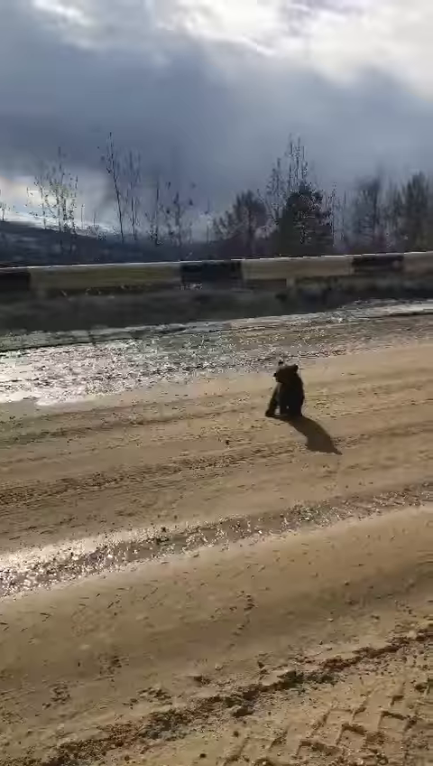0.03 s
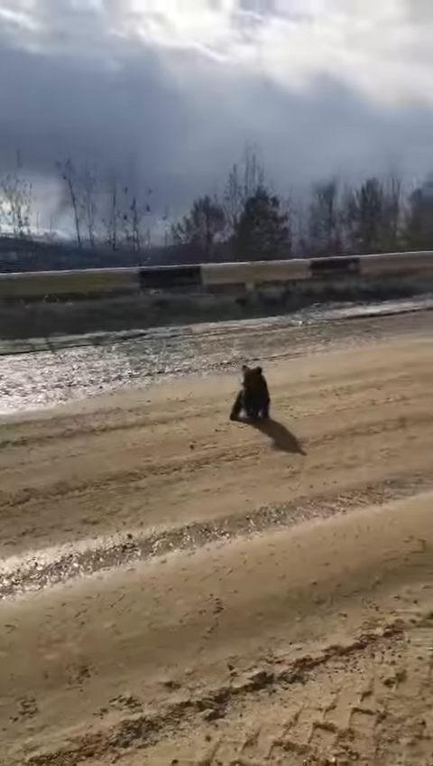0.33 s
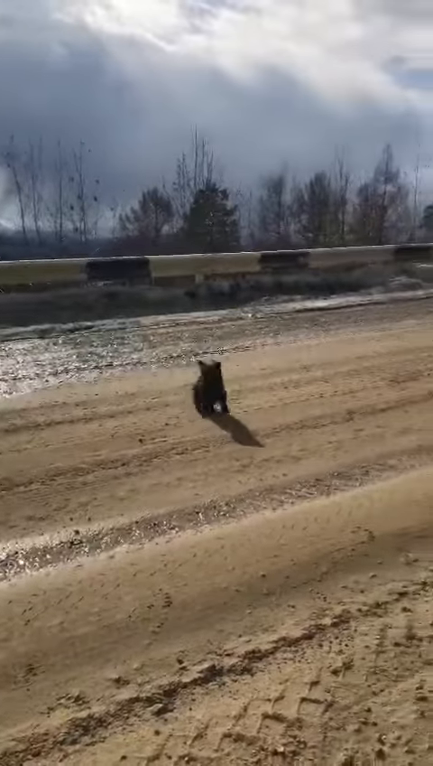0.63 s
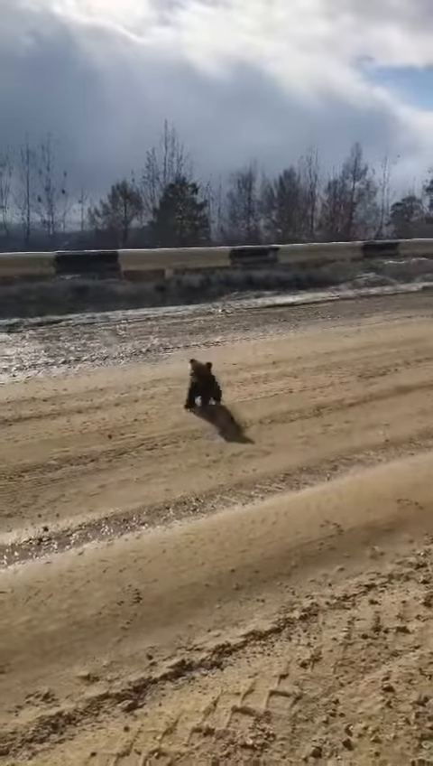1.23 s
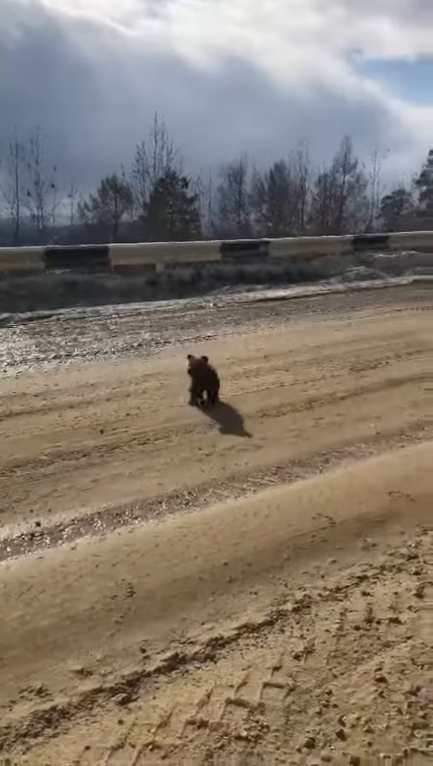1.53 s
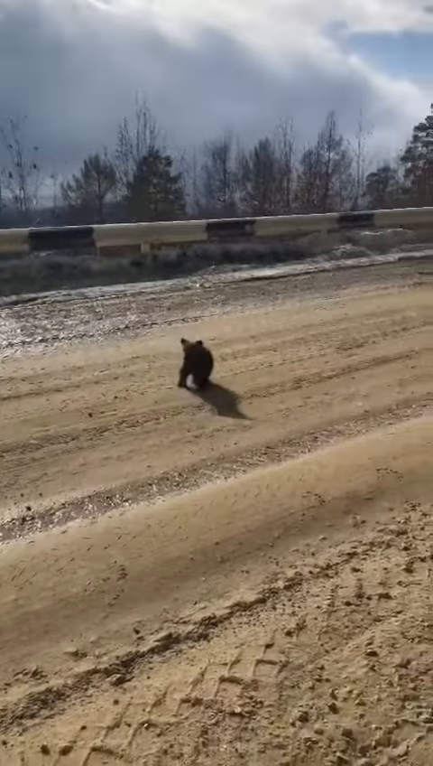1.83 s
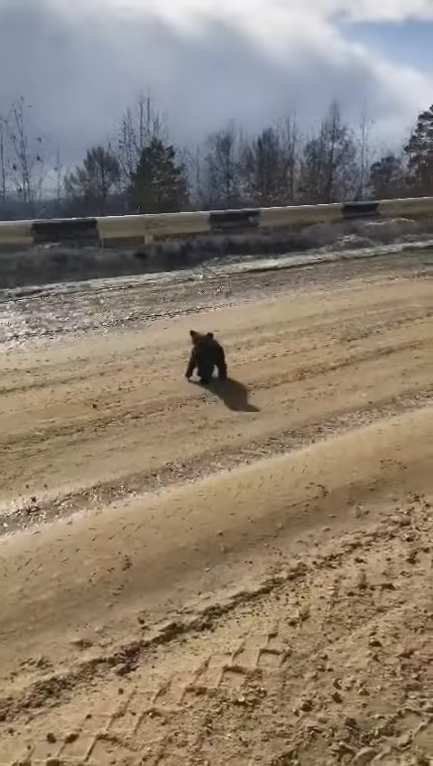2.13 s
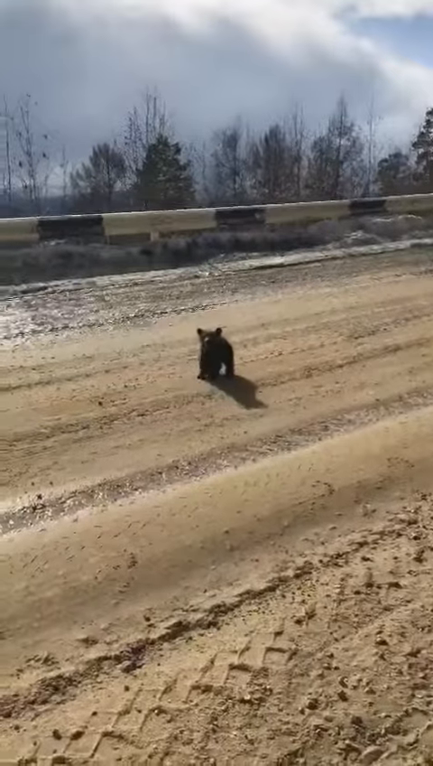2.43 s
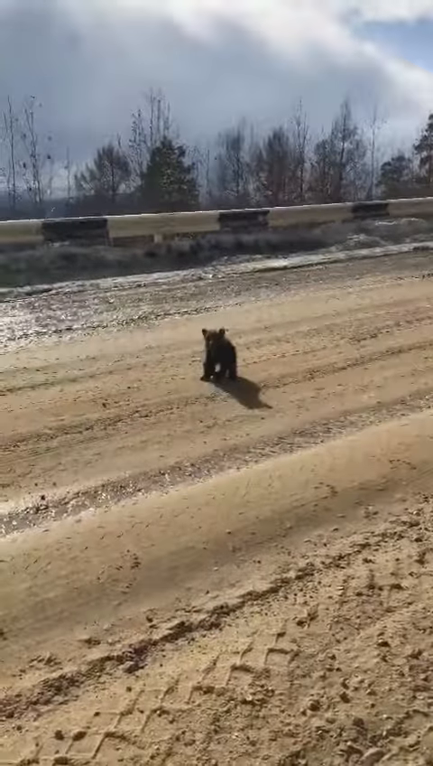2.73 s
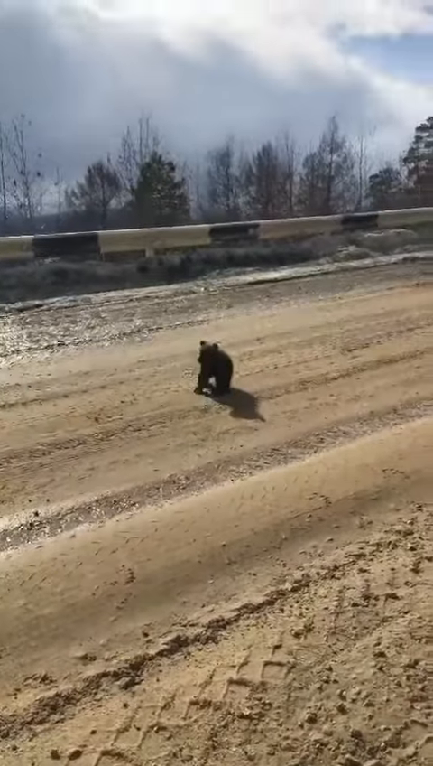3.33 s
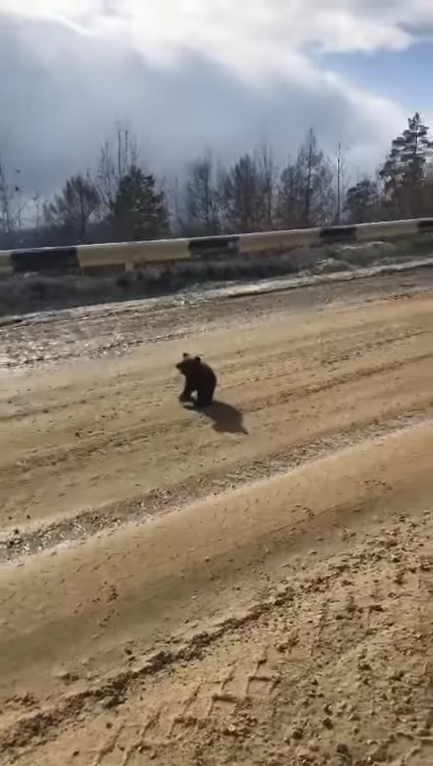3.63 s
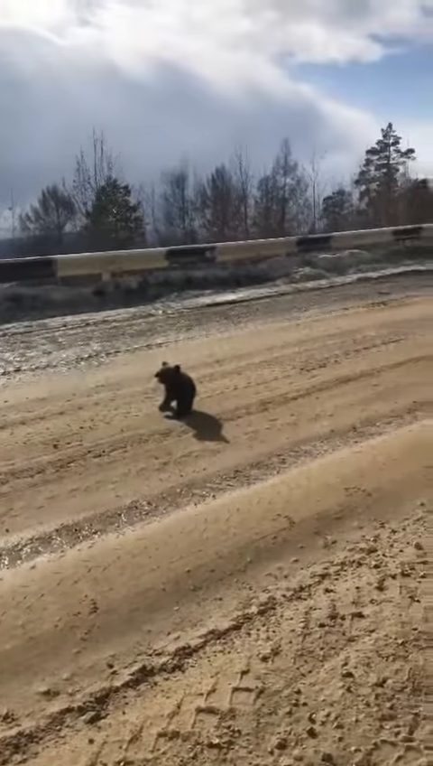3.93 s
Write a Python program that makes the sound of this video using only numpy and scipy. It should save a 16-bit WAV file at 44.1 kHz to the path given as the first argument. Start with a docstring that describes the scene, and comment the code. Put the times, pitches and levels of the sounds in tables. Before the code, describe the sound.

A bear cub ends one hoarse cry, then bawls three more times with short pauses between. A soft sandy scuff follows the first cry. Outdoors on a dirt road, a nearby engine idles quietly under light wind.

```python
"""A bear cub bawls hoarsely four times on a dirt road; the first call is already ending.
Source and filter make the voice: a rasping, rattling pulse train excites throat resonances that
slide as the mouth moves, and each call ends in a short closing note as the mouth shuts.
An engine idles close by under light wind, sounding lines tied to its firing rate and a faint clatter.
A brief soft hiss, like a scuff on sand, follows the first call."""
import sys
import numpy as np
from scipy import signal
from scipy.fft import rfft, irfft, next_fast_len
from scipy.io import wavfile
from scipy.ndimage import uniform_filter1d, map_coordinates

SR = 44100
rng = np.random.default_rng(int(sys.argv[2]) if len(sys.argv) > 2 else 0)


def unload_wav(signal):
    """Save mono or channel-first audio to the path in sys.argv[1] as 16-bit WAV at rate SR, clipped to [-1, 1]."""
    wavfile.write(
        sys.argv[1],
        SR,
        np.round(np.clip(np.atleast_2d(signal).T, -1, 1) * 32767).astype(np.int16),
    )


N = 176400
T = np.arange(N) / SR
FIRING_HZ = 26.74

# The calls. Each row: start and end of the push in seconds, level in dB, attack in seconds,
# moment of a brief sag in seconds (unheard if outside the call), top pitch in Hz.
CALLS = [(-.42, 0.043, -16.5, .06, -.2, 350), (0.847, 1.334, -16, 0.11, 0.5, 357.6),
         (2.096, 2.578, -17, 0.06, 0, 362.4), (3.396, 3.838, -17.5, 0.054, 3.665, 355)]

def cub(release_s=.019, closing_s=.057, notch_hz=7580):
    """Source-filter voicing: breath drives the larynx, the throat shapes it, a closing note ends it."""
    out = np.zeros(N)
    for call, (start, end, db, attack_s, sag_at, top_hz) in enumerate(CALLS):
        age, after = np.maximum(T - start, 0), np.maximum(T - end, 0)
        shut = end + closing_s
        pitch = pitch_arch(age / (shut - start), top_hz)
        source = larynx(pitch)
        voice = ground_scatter(throat(source, call, start, shut))
        bawl = breath_push(age, attack_s, sag_at) * (voice + fundamental(pitch)) + mouth_hiss(age)
        release = np.exp(-after / release_s)
        cutoff = np.exp(-(after / closing_s) ** 6)
        out += amp(db) * cutoff * (release * bawl + (1 - release) * closing_note(source, voice))
    # A narrow, steady gap in the cub's treble.
    return filtered(out, lambda f: amp(-12 * bell(f - notch_hz, 95)))

def breath_push(age, attack_s, sag_at, sag_db=-2, slacken_db_per_s=5):
    """Driving pressure sets loudness: the push builds, slackens steadily and may sag briefly."""
    swell = (1 - np.exp(-age / attack_s)) ** 2.12
    return swell * amp(sag_db * bell(T - sag_at, .016) - slacken_db_per_s * age)

# The pitch contour. Each row: share of the call's length, share of the top pitch.
PITCH_ARCH = [(0, .74), (.25, .85), (.5, 1), (.74, 1.0), (1.001, .76)]

def pitch_arch(progress, top_hz):
    """Frequency modulation: the pitch rises and falls through a call, with a slight random waver."""
    return top_hz * np.interp(progress, *np.transpose(PITCH_ARCH)) * (1 + .028 * wobble(70))

def larynx(pitch, jitter=.13, shimmer_db=2, noise_share=.88, rattle_hz=87.83):
    """Aperiodic phonation: uneven pulses and pulsed turbulence, modulated by flapping throat tissue."""
    cycles = np.cumsum(pitch * (1 + jitter * wobble(300))) / SR
    pulses = np.diff(np.floor(cycles), prepend=0) * amp(shimmer_db * rng.standard_normal(N))
    turbulence = rng.standard_normal(N) * np.exp(-1.3 * (cycles % 1))
    source = np.sqrt(1 - noise_share) * unit(pulses) + np.sqrt(noise_share) * unit(turbulence)
    flaps = np.cumsum(rattle_hz * np.exp(.5 * wobble(rattle_hz))) / SR
    return source * beats(flaps, fall_db=4.5, spread_db=.96)

def fundamental(pitch, level_db=-23.5, spread_db=3.5):
    """The first harmonic: a faint sinusoid of uneven strength at the voice's pitch."""
    tone = np.sin(2 * np.pi * np.cumsum(pitch) / SR)
    return amp(level_db) * unit(tone * amp(spread_db * wobble(40)))

# Throat resonances in mid-call. Each row is one call, in pairs: frequency in Hz, relative level in dB.
FORMANTS = [
    [(1040, 13), (1330, 2), (1620, -6), (2440, 3), (2950, -8), (3230, -3.5), (4300, -11), (4400, -36),
     (6000, -26.5), (7270, -18), (8750, -26.5), (10000, -41)],
    [(1060, 4), (1320, -8), (1590, 0.5), (2230, 2.5), (2830, -9.5), (3140, .5), (3620, -6), (4500, -17),
     (5950, -29), (7230, -18), (8400, -20.5), (9600, -27.5)],
    [(1060, 4), (1290, -4), (1620, -2.5), (2190, -1.5), (2770, -8), (3110, -1), (3680, -6.5), (4400, -11.5),
     (6150, -21.5), (7250, -26), (7980, -24), (10300, -46)],
    [(1075, 7.5), (1240, 0.5), (1680, -1.5), (2100, -3), (2690, -3.5), (3140, 0), (3500, -9), (4350, -13.5),
     (6000, -23.5), (7170, -18), (8400, -27.5), (10200, -55)],
]
# Those resonances, low to high. Each row: half width in Hz, slide over a call in Hz,
# change of gain over a call in dB.
FORMANT_MOTION = [(102, 60, 4), (147, -21, 6), (254, 27, 4.5), (178, -220, -13.5), (198, -98, 7),
                  (160, -30, -2.5), (273, -380, -7.5), (255, -120, 4), (262, -120, 17), (204, -100, -5.5),
                  (377, -350, 10), (1330, 0, -14)]
# Antiresonances in mid-call. Each row is one call: lower frequency in Hz, upper frequency in Hz.
ANTIRESONANCES = [(2060, 3300), (2600, 4570), (2530, 3800), (2290, 3770)]

def throat(source, call, start, shut, valley_db=-33, low_edge_hz=1037, opening_s=.14, dip_slide_hz=-380):
    """Formant filtering: resonances and antiresonances slide as the mouth moves, at steady power."""
    f, t, spectra = signal.stft(source, SR, nperseg=1024, noverlap=768)
    f = f[:, None]
    progress = np.clip((t - start) / (shut - start), 0, 1)
    travel = progress ** .82 - .5 ** .82  # fastest early, zero in mid-call
    power = amp(valley_db) ** 2
    for (hz, db), (width, slide, change_db) in zip(FORMANTS[call], FORMANT_MOTION):
        formant = amp(db + change_db * travel) / (1 + ((f - hz - slide * travel) / width) ** 2)
        power = power + formant ** 2
    gain = np.sqrt(power * above(f, low_edge_hz, 14))
    gain *= amp(2.5 * ripple(spectra.shape) * above(f, 4800, 6))  # narrow, drifting high resonances
    closed = bell(np.maximum(t - start, 0), opening_s)
    gain *= amp(-9.5 * closed * above(f, 4100, 12))  # muffled until the mouth opens
    for hz in ANTIRESONANCES[call]:
        gain *= amp(-8 * bell(f - hz - dip_slide_hz * travel, 90))
    response = minimum_phase(gain / np.linalg.norm(gain, axis=0))
    _, voice = signal.istft(spectra * response, SR, nperseg=1024, noverlap=768)
    return unit(voice[:N])

def closing_note(source, voice, level_db=-14.5):
    """A single resonance dominates as the mouth shuts, over a little of the full voice."""
    return amp(level_db) * (resonance(source, hz=1430, width_hz=160) + amp(-7) * voice)

# The spectrum of the breath. Each row: frequency in Hz, relative level in dB.
BREATH_SPECTRUM = [(3000, -28), (5500, -0.5), (7000, -1.5), (7600, -20), (8700, 0), (10500, -11),
                   (12000, -6)]

def mouth_hiss(age, level_db=-18.5, lag_s=.018, attack_s=.041, decay_s=.18):
    """Turbulence: air through the opening mouth hisses early in a call, then dies away."""
    blown = np.maximum(age - lag_s, 0)
    envelope = (1 - bell(blown, attack_s)) * np.exp(-blown / decay_s)
    return amp(level_db) * envelope * noise(BREATH_SPECTRUM)

def ground_scatter(x, level_db=-11.5, t60_s=.15):
    """Diffuse reflection: the rough road adds a short tail to the direct sound."""
    t = T[:SR // 8]
    tail = rng.standard_normal(len(t)) * amp(-60 * t / t60_s)
    reflections = signal.fftconvolve(x, tail / np.linalg.norm(tail))[:N]
    return unit(x + amp(level_db) * reflections)

# Engine lines. Each row: multiple of the firing rate, level in dB.
ENGINE_LINES = [(3, -35), (3.5, -41), (4, -50), (5, -49), (6, -46.5), (7.5, -47), (10.25, -51.5), (30, -55)]
# The boom at twice the firing rate. Each row: time in seconds, level in dB.
BOOM_LEVELS = [(0.0, -36), (0.42, -51), (0.49, -55), (0.63, -30.5), (1.06, -41), (1.85, -31.5), (2.23, -43),
               (2.66, -32), (3.02, -40), (3.46, -29), (3.81, -55), (4.0, -41)]
# The low rumble of engine and wind. Each row: frequency in Hz, relative level in dB.
RUMBLE_SPECTRUM = [(18, -36), (27, -19), (42, -6), (54, -16.5), (65, -7), (88, -3), (120, -8), (243, -14.5),
                   (390, -15), (700, -29.5), (1000, -51)]
# The airy noise above it. Each row: frequency in Hz, relative level in dB.
AIR_SPECTRUM = [(350, -48), (600, -10.5), (680, -10.5), (896, 1.5), (1100, -8.5), (2240, -18),
                (2770, -19.5), (4400, -21), (5590, -25.5), (12000, -49.5)]

def engine_idle(rumble_db=-35.5, air_db=-41, throb_depth=.12):
    """Periodic firing gives a line spectrum and modulates the amplitude of the rumble and airy noise."""
    firings = np.cumsum(FIRING_HZ * (1 + .00516 * wobble(4))) / SR

    def line(multiple):
        return unit(np.sin(2 * np.pi * (multiple * firings + rng.random())))

    lines = sum(amp(db + .54 * wobble(3.5)) * line(multiple) for multiple, db in ENGINE_LINES)
    boom = amp(np.interp(T, *np.transpose(BOOM_LEVELS))) * line(2)
    throb = 1 + throb_depth * np.cos(2 * np.pi * firings)
    rumble = amp(rumble_db + 2.7 * wobble(5.5)) * noise(RUMBLE_SPECTRUM)
    air = amp(air_db + .12 * wobble(9.44)) * noise(AIR_SPECTRUM)
    return lines + boom + throb * (rumble + air)

# The spectrum of the engine's chatter. Each row: frequency in Hz, relative level in dB.
CHATTER_SPECTRUM = [(900, -33), (1400, -8), (1780, 6.5), (2300, -2), (2750, -4), (7000, -34)]

def engine_clatter(chatter_db=-50, tick_db=-47, tick_at_s=.365, period_s=.1658):
    """Gated noise: a decaying burst at the firing rate, and a narrow-band tick about six times a second."""
    from_tick_s = (((T - tick_at_s) / period_s + .5) % 1 - .5) * period_s
    ring = resonance(rng.standard_normal(N), hz=2250, width_hz=170)
    ticks = amp(tick_db) * bell(from_tick_s, .0099) * ring
    bursts = beats(T * FIRING_HZ, fall_db=9, spread_db=.6)
    return ticks + amp(chatter_db) * bursts * noise(CHATTER_SPECTRUM)

# The envelope of the scuff. Each row: time in seconds, level in dB.
SCUFF_LEVELS = [(.12, -63), (.19, -40.5), (.31, -42), (.42, -64)]
# Its spectrum. Each row: frequency in Hz, relative level in dB.
SAND_SPECTRUM = [(500, -44), (1100, 9), (1450, 2), (2300, 2.5), (7600, -3.5), (8800, 0), (12000, -12)]

def scuff():
    """Friction noise: sand gives a short, soft, slightly grainy hiss."""
    level_db = np.interp(T, *np.transpose(SCUFF_LEVELS), left=-120, right=-120)
    return amp(level_db + .93 * wobble(118)) * noise(SAND_SPECTRUM)

def amp(db):
    """Decibels to amplitude ratio."""
    return 10 ** (np.asarray(db) / 20)

def unit(x):
    """Normalisation to rms 1."""
    return x / np.sqrt(np.mean(x ** 2) + 1e-20)

def bell(offset, width):
    """A Gaussian curve that falls to 1/e at one width from its peak."""
    return np.exp(-(offset / width) ** 2)

def above(f, edge_hz, steepness):
    """A high-pass weighting that rises from 0 to 1 around the edge."""
    return 1 / (1 + (edge_hz / (f + 1)) ** steepness)

def wobble(rate):
    """Smooth random modulation with rate knots a second."""
    return map_coordinates(rng.standard_normal(int(N * rate / SR) + 4), [T * rate])

def beats(cycles, fall_db, spread_db):
    """Repeated exponential decay: an envelope of rms 1 that jumps to a random height once a cycle."""
    size_db = spread_db * rng.standard_normal(N)[cycles.astype(int)]
    return unit(amp(size_db - fall_db * (cycles % 1)))

def ripple(shape):
    """A random field of rms 1, correlated over a few hundred Hz and a few tenths of a second."""
    field = rng.standard_normal(shape)
    for _ in range(2):
        field = uniform_filter1d(uniform_filter1d(field, size=6, axis=0), size=40, axis=1)
    return unit(field)

def filtered(x, response):
    """Linear filtering: the spectrum of x times a frequency response."""
    size = next_fast_len(N + 8192)
    return irfft(rfft(x, size) * response(np.fft.rfftfreq(size, 1 / SR)), size)[:N]

def noise(spectrum):
    """Spectral shaping: noise of rms 1 that follows (Hz, dB) points."""
    hz, db = np.transpose(spectrum)
    white = rng.standard_normal(N)
    return unit(filtered(white, lambda f: amp(np.interp(np.log(f + 1), np.log(hz + 1), db))))

def resonance(x, hz, width_hz):
    """Band-pass filtering by one Lorentzian peak of the given half width, at rms 1."""
    return unit(filtered(x, lambda f: 1 / (1 + ((f - hz) / width_hz) ** 2)))

def minimum_phase(gain):
    """Causality: each column of gains gets the phase of a resonator that rings after it is struck."""
    cepstrum = irfft(np.log(gain + 1e-9), axis=0)
    half = len(cepstrum) // 2
    fold = np.r_[1, np.full(half - 1, 2), 1, np.zeros(half - 1)]
    return np.exp(rfft(cepstrum * fold[:, None], axis=0))

def scene():
    """Superposition: cub, engine and scuff add in the open air, in one channel."""
    return (cub() + engine_idle() + engine_clatter() + scuff())[None]

def record(dry, ceiling=.58, top_hz=12350):
    """Soft saturation rounds the highest peaks, and a steep low-pass limits the band."""
    rounded = dry[0] / (1 + (dry[0] / ceiling) ** 4) ** .25
    return filtered(rounded, lambda f: np.clip((top_hz - f) / 600, 0, 1))[None]

dry = scene()
out = record(dry)
unload_wav(out)
```